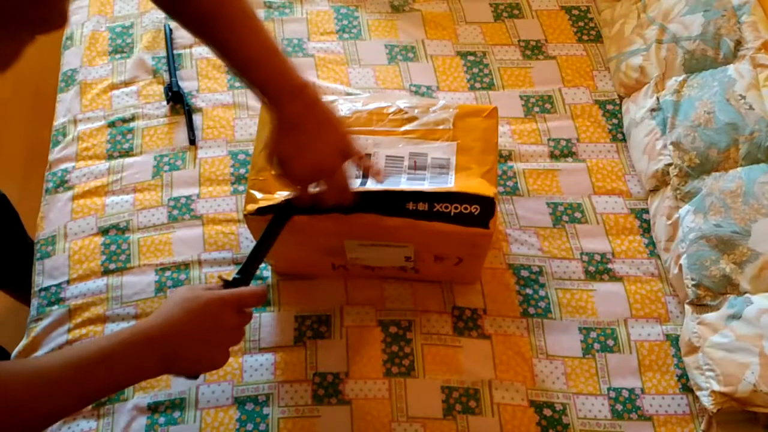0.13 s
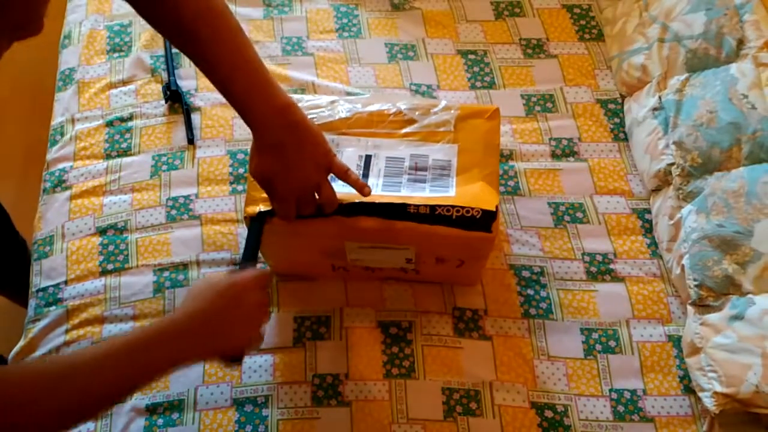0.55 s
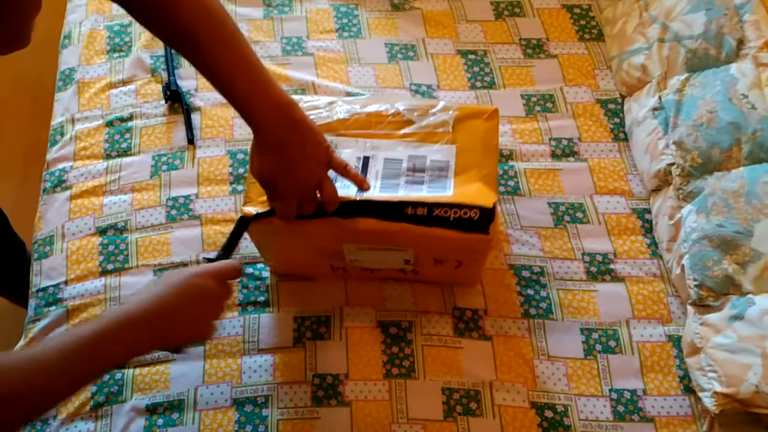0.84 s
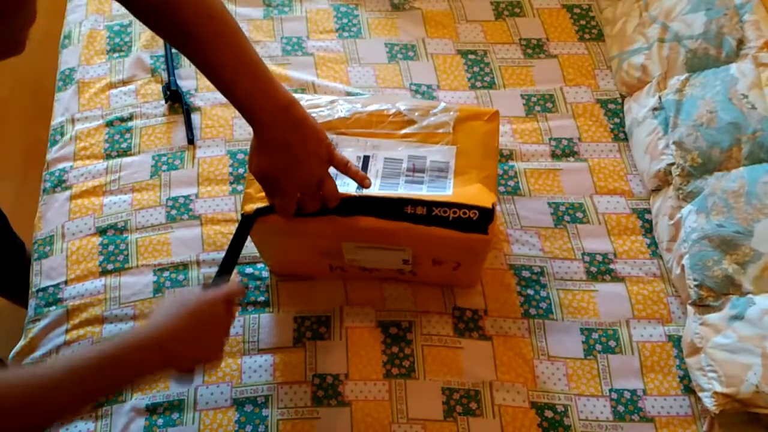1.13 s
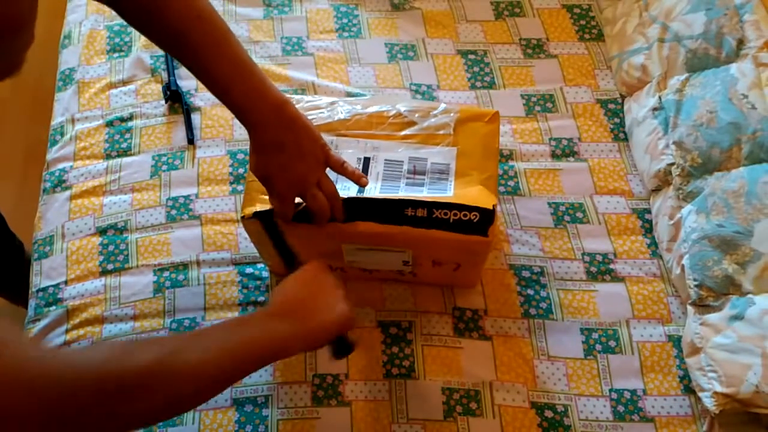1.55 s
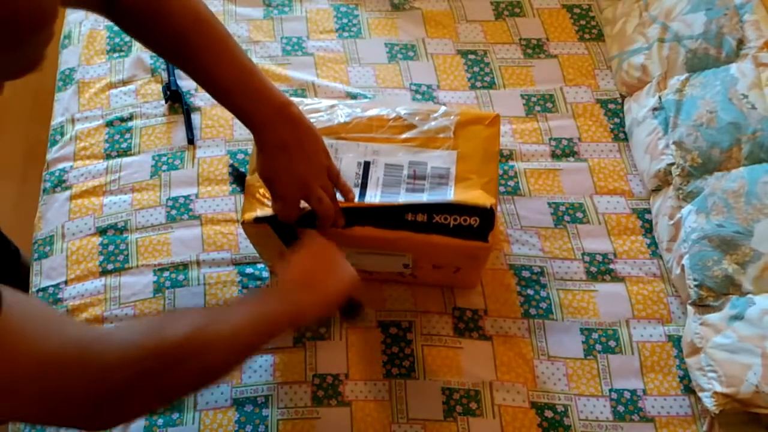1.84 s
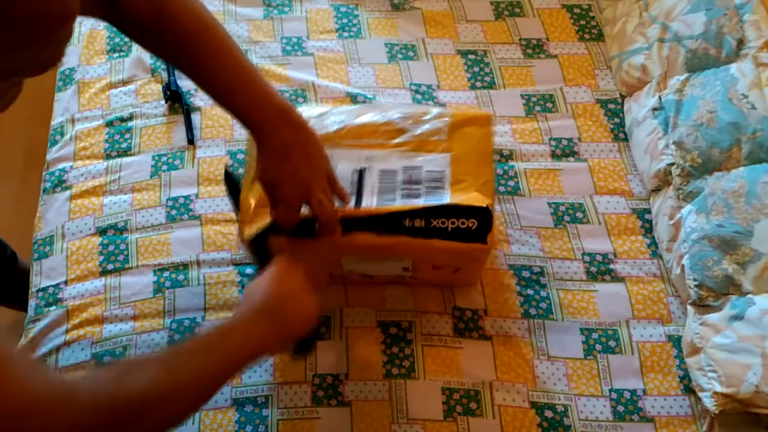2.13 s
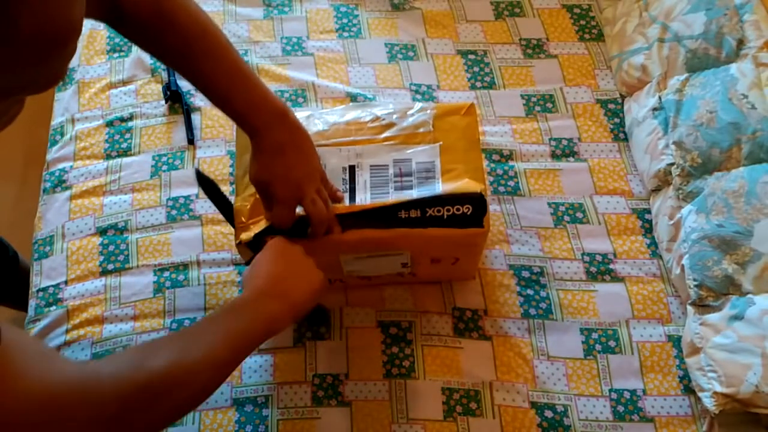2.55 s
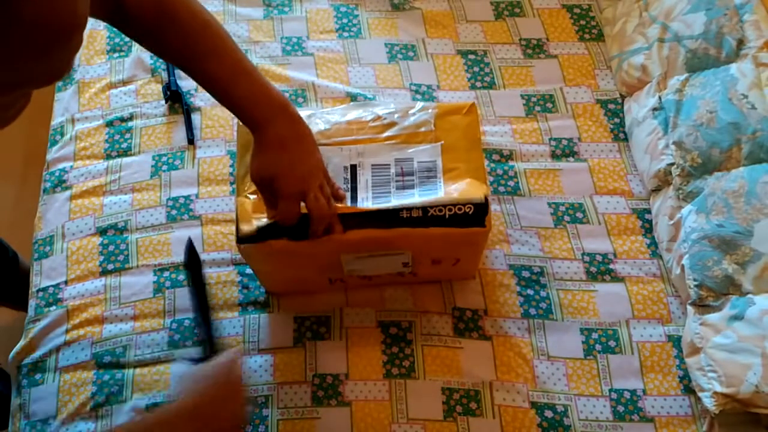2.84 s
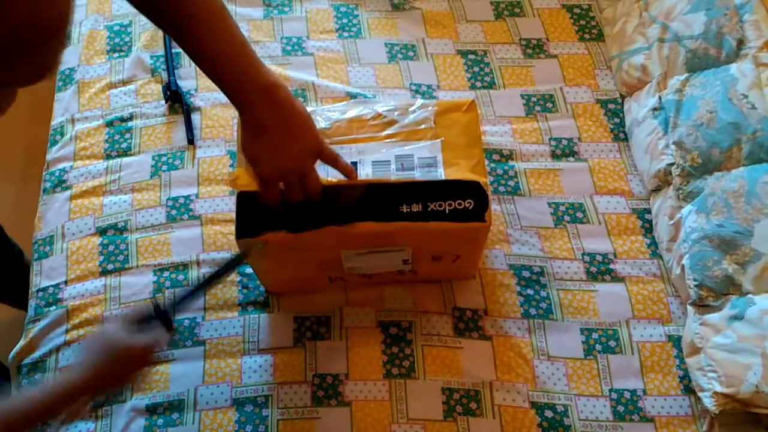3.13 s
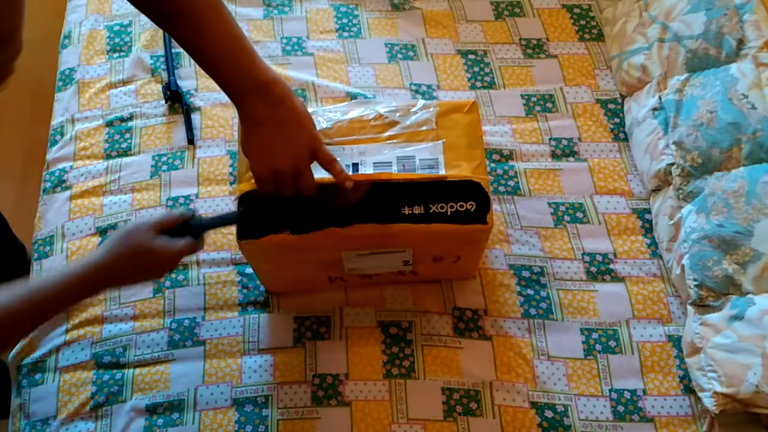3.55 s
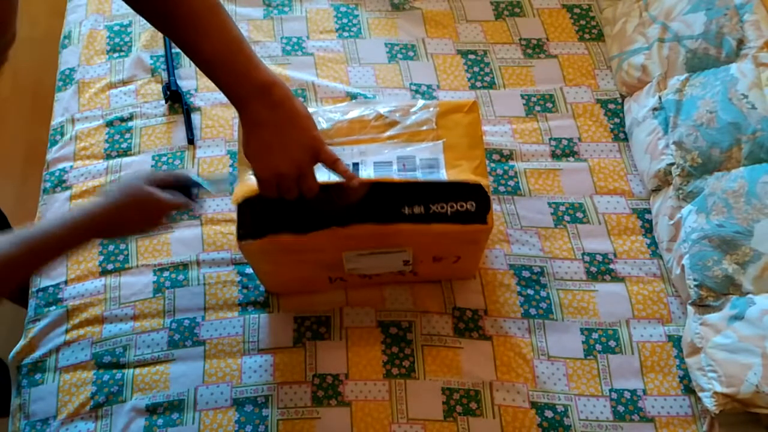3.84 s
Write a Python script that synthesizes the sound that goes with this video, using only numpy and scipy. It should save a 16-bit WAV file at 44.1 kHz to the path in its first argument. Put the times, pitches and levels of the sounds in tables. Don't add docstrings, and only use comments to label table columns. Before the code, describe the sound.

Close in a quiet bedroom, a blade works at a wrapped box on a bed, with soft knocks, brief rasping drags, sharp film snaps and low handling thumps, growing busier and finishing in a hard crackling cut.

```python
import sys
import numpy as np
from scipy import signal
from scipy.fft import rfft, irfft, next_fast_len
from scipy.io import wavfile
from scipy.ndimage import uniform_filter1d, map_coordinates

SR = 44100
rng = np.random.default_rng(int(sys.argv[2]) if len(sys.argv) > 2 else 0)


def gain_from_db(level_db):
    decades = np.asarray(level_db, float) / 20
    return 10 ** decades


def materialize(psi):
    bounded = np.clip(np.atleast_2d(psi).T, -1, 1)
    quanta = np.round(bounded * 32767).astype(np.int16)
    wavfile.write(sys.argv[1], SR, quanta)


N = 176400
GRAIN_SPREAD_DB = 2.3
FIRST_BREAK = 0.6


def unit(x):
    return x / np.sqrt(np.mean(x ** 2) + 1e-20)


def along(points, hz):
    f, v = np.transpose(points)
    return np.interp(np.log(hz + 1), np.log(f + 1), v)


def curve(rows, axis=1):
    cols = np.transpose(rows)
    return np.interp(np.arange(N) / SR, cols[0], cols[axis])


def wobble(rate):
    knots = rng.standard_normal(int(N * rate / SR) + 4)
    return map_coordinates(knots, [np.arange(N) * rate / SR])


def filtered(x, response):
    m = next_fast_len(N + SR // 2)
    r = response(np.fft.rfftfreq(m, 1 / SR))
    r = r / np.sqrt(np.mean(np.abs(r) ** 2))
    return irfft(rfft(x, m) * r, m)[..., :N]


def causal(points):
    def response(hz):
        cepstrum = irfft(np.log(gain_from_db(along(points, hz))))
        half = len(cepstrum) // 2
        cepstrum[1:half] *= 2
        cepstrum[half + 1:] = 0
        return np.exp(rfft(cepstrum))
    return response


def resonant(peaks):
    def response(f):
        total = 0
        for k, (centre, width, db) in enumerate(peaks):
            damping = 1j * f * width
            total = total + (-1) ** k * gain_from_db(db) * damping / (centre * centre - f * f + damping)
        return total
    return response


def crackle(per_s, spread_db):
    size_draw, time_draw = rng.random((2, N))
    size = gain_from_db(-spread_db * np.log(size_draw + 1e-4)) * rng.standard_normal(N)
    gate = np.clip((per_s / SR - time_draw) * 300, 0.05, 1)
    return unit(size * gate)


# (time [s], level [dB])
HAND_PRESSURE = [(0, -66), (.25, -62.5), (.44, -71), (.56, -67), (.75, -69), (.96, -63), (1.25, -70),
                 (1.45, -65), (1.7, -66), (1.94, -61), (2.22, -60), (2.54, -60), (3.14, -60), (3.55, -70),
                 (3.8, -63), (4, -63)]
# (frequency [Hz], level [dB])
WRAPPING_HISS = [(410, -40), (700, -8), (1950, -7), (3720, -6), (4120, 0.5), (4440, -9.5), (6330, 2),
                 (14400, -17.5)]


def rustle():
    smooth = 0.99 * rng.standard_normal(N)
    grainy = 0.4 * crackle(2500, GRAIN_SPREAD_DB) * gain_from_db(wobble(14))
    z = signal.stft(unit(smooth + grainy), nperseg=256)[2]
    field = uniform_filter1d(rng.standard_normal(z.shape), 9, 0)
    field = uniform_filter1d(field, 14, 1)
    patch_db = 2.4 * unit(field)
    patchy = signal.istft(z * gain_from_db(patch_db), nperseg=256)[1][:N]
    return gain_from_db(curve(HAND_PRESSURE)) * filtered(unit(patchy), lambda hz: gain_from_db(along(WRAPPING_HISS, hz)))


# (time [s], deep level [dB], drone level [dB])
RUMBLE_LEVELS = [(0.05, -63, -67), (.35, -59.5, -61), (.62, -68, -64), (.78, -60, -63), (.95, -67, -61.5),
                 (1.15, -55, -55), (1.55, -66, -61), (1.75, -53, -57), (1.9, -56, -53), (2.05, -61, -64),
                 (2.3, -69, -69), (2.6, -55, -59), (2.9, -54, -60), (3.15, -58, -51), (3.52, -63, -56),
                 (3.75, -50, -48), (3.86, -47, -44), (4, -58, -52)]
# (frequency [Hz], level [dB])
DRONE_COLOUR = [(82, 1), (140, 12.5), (259, 12.5), (457, -2), (900, -15), (1170, -31), (1980, -120)]
# (frequency [Hz], width [Hz], level [dB])
DRONE_MODES = [(157.5, 15, -3.5), (200.2, 16, -5), (252, 18, -1.5), (346, 16, -9.5), (419, 17, -9.5)]
# (frequency [Hz], width [Hz], level [dB])
HUM_MODES = [(42, 17, -11.5), (69, 38.7, -5), (126, 9.1, -12)]


def modal_noise(peaks):
    once = filtered(rng.standard_normal(N), resonant(peaks))
    return unit(filtered(once, resonant(peaks)))


def rumble():
    broad = unit(filtered(rng.standard_normal(N), lambda hz: gain_from_db(along(DRONE_COLOUR, hz))))
    drone = unit(broad + modal_noise(DRONE_MODES))
    drone_level = gain_from_db(curve(RUMBLE_LEVELS, axis=2) + wobble(12))
    hum_level = gain_from_db(curve(RUMBLE_LEVELS) + 2.9 * wobble(8.8))
    return drone_level * drone + hum_level * modal_noise(HUM_MODES)


# (frequency [Hz], level [dB])
FILM_COLOUR = [(1500, -40), (3500, -15), (5000, -4), (6600, 0), (9000, -10), (14500, -37)]
# (frequency [Hz], level [dB])
TAPE_COLOUR = [(500, -36), (1500, -7), (2300, -1.5), (3200, 0), (4600, -3.5), (9000, -34)]
# (frequency [Hz], level [dB])
CARTON_COLOUR = [(150, -24), (480, -5), (800, -7), (1100, 0), (1800, -6), (4000, -30)]


def materials(drive):
    colours = (FILM_COLOUR, TAPE_COLOUR, CARTON_COLOUR)
    return sum(filtered(d, causal(colour)) for d, colour in zip(drive, colours))


# (start [s], length [s], film level [dB], tape level [dB], carton level [dB])
BLADE_STROKES = [(0.03, 0.23, -63, -88, -78.5), (0.586, 0.047, -60, -59, -65),
                 (0.783, 0.21, -48.5, -50, -62.5), (0.158, 0.14, -61, -68, -79),
                 (3.06, 0.13, -67, -65.5, -69.5), (0.95, 0.26, -68.5, -67.5, -87),
                 (1.776, 0.12, -54.5, -57.5, -59.5), (2.085, 0.085, -54, -58, -74),
                 (2.29, 0.06, -48, -51, -60), (2.495, 0.09, -56, -51, -54), (2.653, 0.043, -51.5, -48, -54),
                 (2.829, 0.035, -52, -58, -67), (2.66, 0.1, -57, -58, -61), (3.625, 0.11, -80, -74, -60),
                 (0.27, 0.2, -80, -69, -63), (3.704, 0.04, -58, -94, -62.5), (3.818, 0.15, -45.5, -47, -52)]
# (start [s], length [s], film level [dB], tape level [dB], carton level [dB])
SLOW_DRAGS = [
    (1.85, 0.095, -51, -52, -60),
    (2.46, 0.07, -59, -62, -63),
    (2.625, 0.035, -60, -58, -56),
    (3.15, 0.14, -47, -55, -55),
    (2.36, 0.1, -70, -68, -72),
    (2.22, 0.06, -61, -70, -75),
]


def strokes():
    t, env = np.arange(N) / SR, np.zeros((3, N))
    for rows, rise, hold in ((BLADE_STROKES, 0.12, 0.58), (SLOW_DRAGS, 0.45, 0.6)):
        for start, length, *db in rows:
            shape = np.interp((t - start) / length, [0, rise, hold, 1], [0, 1, 1, 0])
            env += gain_from_db(db)[:, None] * shape ** 1.63
    shared_db = 2 * wobble(50)
    own_db = 2 * np.array([wobble(34.7), wobble(34.16), wobble(35.14)])
    grains = np.array([crackle(4500, GRAIN_SPREAD_DB) for _ in env])
    return materials(env * gain_from_db(shared_db + own_db) * grains)


def breaks(rows, decay_s, rise_s, gains_db, first=0):
    t = np.arange(SR // 25) / SR
    out = np.zeros((len(gains_db), 2, N + SR))
    fine = np.array([crackle(9000, 1.6) for _ in gains_db])
    onset = t == 0
    envelope = gain_from_db(-20 * t / np.asarray(decay_s)) * (1 - np.exp(-t / rise_s))
    for k, (s, *db) in enumerate(rows):
        burst = fine[:, k * len(t):][:, :len(t)] * envelope
        burst = burst / np.linalg.norm(burst, axis=1)[:, None] + first * onset
        click = np.linalg.norm(burst, axis=1)[:, None] * onset
        level = gain_from_db(np.add(db, gains_db))[:, None, None]
        out[..., round(s * SR):][..., :len(t)] += level * np.stack([burst, click], axis=1)
    return out[..., :N]


# (time [s], film level [dB], tape level [dB], carton level [dB])
SHARP_SNAPS = [(0.8278, -43, -37.5, -55), (1.3529, -35.5, -58.5, -65), (1.6605, -41.5, -56.5, -92),
               (1.7833, -39, -59, -49), (2.0693, -35.5, -38, -57.5), (2.2767, -27.5, -38.5, -39.5),
               (2.2984, -36, -60, -66), (2.4973, -28, -38.5, -49), (2.6481, -36, -32, -38),
               (2.7886, -32, -48, -77), (2.9635, -29.5, -46, -64), (3.0664, -27.5, -39.5, -50.5),
               (3.4121, -30.5, -60, -64), (3.8241, -29.5, -34.5, -39.5), (3.8547, -15, -31, -59)]
# (time [s], film level [dB], tape level [dB], carton level [dB])
SOFT_CRINKLES = [(0.0566, -37, -52.5, -57), (0.0702, -36, -67, -68), (0.3607, -47, -61, -67),
                 (0.9481, -33, -51, -61), (1.509, -39, -72, -64), (1.7392, -43.5, -54, -77),
                 (2.0293, -38, -48, -83), (2.1344, -47, -45.5, -66), (2.8067, -36, -35, -78),
                 (3.109, -38, -56, -73), (3.1717, -34, -47, -73), (3.5926, -40, -65, -68),
                 (3.704, -36, -58, -75), (3.9732, -33, -33, -56), (0.8056, -42, -46, -70),
                 (0.604, -44, -46, -66), (2.1166, -42, -46, -70), (2.834, -38, -46, -62),
                 (3.7469, -44, -70, -75), (1.4117, -50, -65, -80), (1.0355, -47, -60, -80),
                 (3.205, -40, -52, -70), (2.998, -48, -60, -70)]
# (decay per material [s], rise [s], gain per material [dB])
SNAP_COURSE = ([[0.0061], [0.014], [0.0094]], 0.00039, [10.85, 20.1, 19.75])
# (decay [s], rise [s], gain per material [dB])
CRINKLE_COURSE = (0.021, 0.001, [12.2, 18.6, 14.7])


def snaps():
    sharp = breaks(SHARP_SNAPS, *SNAP_COURSE, first=FIRST_BREAK)
    return materials(sharp + breaks(SOFT_CRINKLES, *CRINKLE_COURSE))


# (time [s], body level [dB], panel level [dB], face level [dB])
CARTON_TAPS = [(0.157, -55, -44, -66), (0.271, -29, -32, -26), (0.359, -31, -29, -30),
               (0.511, -42, -36.5, -40), (1.167, -62, -66, -46), (1.784, -33, -48, -60),
               (3.18, -48, -35, -39), (3.625, -24.5, -28.5, -33), (3.874, -23.5, -32, -32),
               (0.615, -60, -48, -52), (1.891, -33, -58, -58), (2.209, -56, -49, -58),
               (2.277, -42, -37, -45), (2.647, -21.5, -42, -44), (2.996, -48, -48, -49),
               (3.819, -31, -41, -47), (1.815, -42, -48, -60), (3.205, -60, -42, -44),
               (0.829, -42, -50, -60), (1.96, -43, -60, -66), (2.03, -39, -66, -66), (2.499, -34, -50, -55),
               (3.704, -44, -60, -66), (3.855, -27, -45, -50), (2.134, -46, -62, -64)]
# (frequency [Hz], width [Hz], level [dB])
BODY_MODES = [(175, 80, 3), (420, 220, -1), (600, 220, 0)]
# (frequency [Hz], width [Hz], level [dB])
PANEL_MODES = [(800, 380, -2), (1070, 220, 1)]
# (frequency [Hz], width [Hz], level [dB])
FACE_MODES = [(1450, 650, 0), (1950, 600, -1), (2550, 700, -1), (4000, 1000, -18)]


def taps():
    drive = breaks(CARTON_TAPS, 0.026, 0.00033, [17, 17, 17], first=2 * FIRST_BREAK)
    walls = (BODY_MODES, PANEL_MODES, FACE_MODES)
    ringing = sum(filtered(d, resonant(wall)) for d, wall in zip(drive, walls))
    soft_contact = causal([(2800, -1), (4800, -16), (20000, -76)])
    return filtered(ringing, soft_contact) * 0.12


# (time [s], level [dB], frequency [Hz])
BED_THUMPS = [(0.37, -40, 56.5), (1.1, -40.5, 71.4), (1.221, -36.5, 69), (1.798, -41, 230),
              (2.504, -41, 67.3), (2.538, -34, 217), (2.652, -37.5, 131), (2.699, -38.5, 70),
              (2.963, -44, 68.5), (3.06, -50, 74), (3.692, -35.5, 81.4), (3.83, -34.5, 76),
              (3.871, -31, 139), (3.919, -32.5, 63.5), (1.9, -40, 70), (1.99, -41, 65), (2.125, -41, 70),
              (2.185, -41, 72), (0.19, -44, 75), (0.275, -40, 170), (0.365, -41, 170), (1.24, -44, 140),
              (2.79, -42, 68), (1.81, -42, 110)]


def thumps():
    out, t = np.zeros(N + SR), np.arange(SR // 4) / SR
    for s, db, hz in BED_THUMPS:
        u = t * hz / 1.01
        pulse = u * np.exp(1 - u) * np.sin(2 * np.pi * hz * t)
        out[round(s * SR):][:len(t)] += gain_from_db(db - 6) * pulse
    return out[:N]


# (frequency [Hz], time to fall 60 dB [s])
ROOM_DECAY = [(300, 0.31), (2000, 0.3), (7000, 0.38), (14000, 0.24)]


def room(x, count=16):
    out, step = np.zeros(N + 2 * SR), N // count
    gap_s, early = 0.015, gain_from_db(-3.5)
    for k in range(count):
        hz, t, z = signal.stft(rng.standard_normal(SR // 2), SR, nperseg=256)
        decay = gain_from_db(-60 * t / along(ROOM_DECAY, hz)[:, None])
        tail = signal.istft(z * decay, SR, nperseg=256)[1]
        tail_s = np.arange(len(tail)) / SR
        tail = tail * np.interp(tail_s, [0.002, 0.003, gap_s, gap_s + 0.007], [0, early, early, 1])
        wet = signal.fftconvolve(x[k * step:(k + 1) * step], tail / np.linalg.norm(tail))
        out[k * step:][:len(wet)] += wet
    return out[:N]


def scene():
    floor = rustle() + rumble()
    near, far = strokes() + snaps() + taps()
    return (near + gain_from_db(-3) * room(far) + floor + thumps())[None]


def top_cut(x):
    return signal.sosfilt(signal.butter(12, 14970, fs=SR, output="sos"), x)


def record(dry):
    m = next_fast_len(N + 8192)
    above_hz = np.fft.rfftfreq(m, 1 / SR) - 14480
    edge = gain_from_db(-np.clip(above_hz / 4, 0, 45))
    mix = irfft(rfft(dry, m) * edge, m)[:, :N]
    return top_cut(mix)


dry = scene()
out = record(dry)
materialize(out)
```